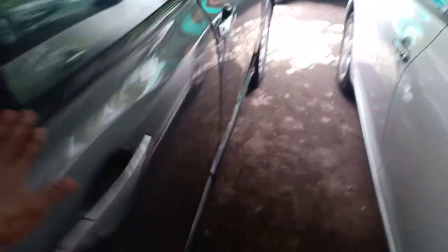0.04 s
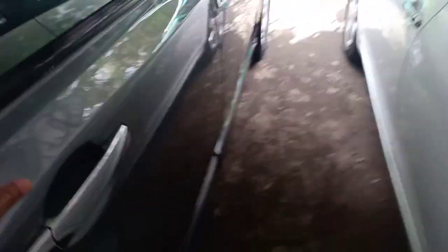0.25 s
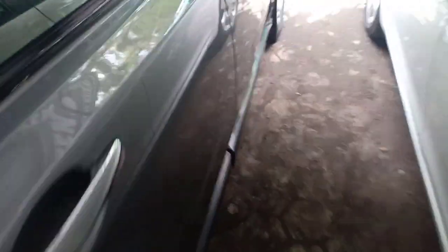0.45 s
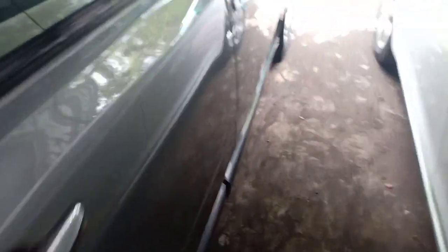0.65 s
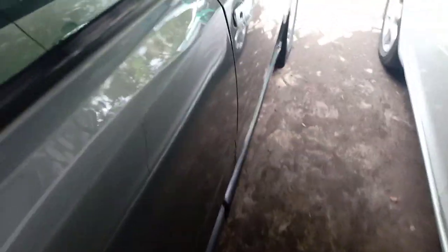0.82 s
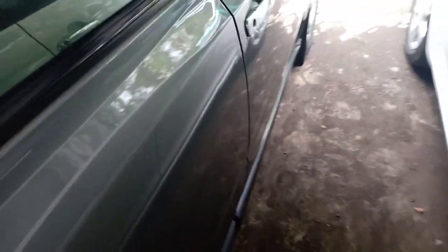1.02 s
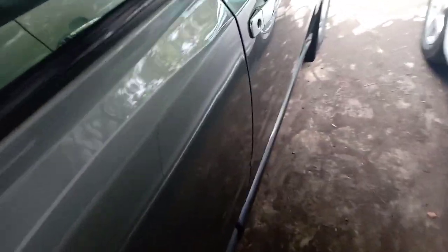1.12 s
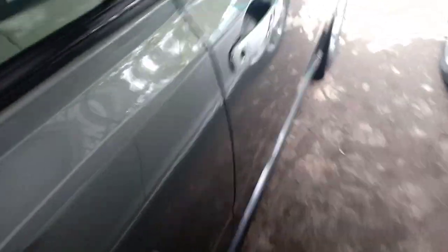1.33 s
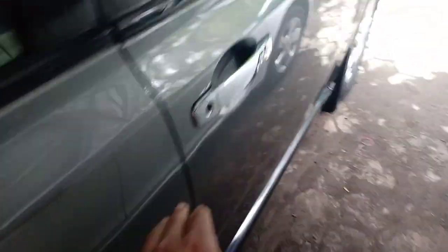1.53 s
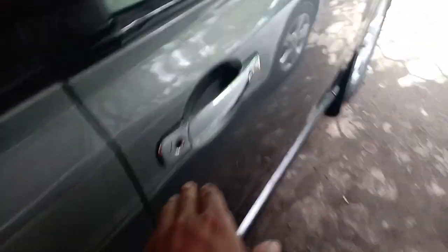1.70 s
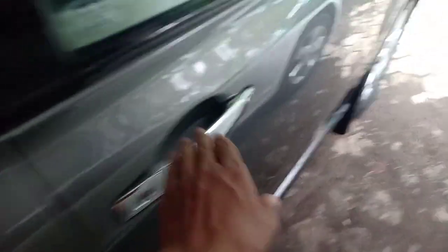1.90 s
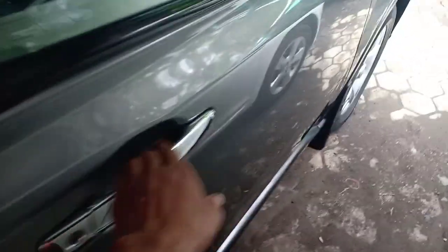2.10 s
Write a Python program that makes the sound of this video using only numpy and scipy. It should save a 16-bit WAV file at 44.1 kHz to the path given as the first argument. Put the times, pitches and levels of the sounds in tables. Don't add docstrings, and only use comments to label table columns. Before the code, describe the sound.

A car door slams shut with a hard metallic clack and thump, then shoes scuff grit.

```python
import sys
import numpy as np
from scipy import signal
from scipy.fft import rfft, irfft
from scipy.io import wavfile
from scipy.ndimage import uniform_filter1d

SR = 44100
rng = np.random.default_rng(int(sys.argv[2]) if len(sys.argv) > 2 else 0)


def boost_factor(decibels):
    exponent = np.asarray(decibels, float) / 20
    return 10 ** exponent


def store_pcm(level_fs):
    pcm = np.round(np.clip(level_fs, -1, 1) * 32767).astype(np.int16)
    wavfile.write(sys.argv[1], SR, np.atleast_2d(pcm).T)


N = 94815

DOOR_LAG_S, SHOE_LAG_S = 0.00037, 0.0001


def door():
    body = latch_metal() + panel_thump() + body_shudder()
    return body * pan(-2.5) + cracks() * pan(4)


# start in seconds, then
# striker, latch, panel and crack levels in dB.
DOOR_BLOWS = [(0.057, -43, -34, -38, -41), (.068, -41.5, -36, -37.5, -49), (.084, -48, -60, -39.5, -50),
              (0.205, -9, -38, -58, -23), (0.2079, -17, -33, -48, -23.5), (0.218, -26, -32, -27, -22.5),
              (0.226, -19, -33, -29.5, -17.5), (0.2331, -30.5, -14.5, -22, -54),
              (0.2383, -17.5, -16, -16.5, -26), (0.2419, -22, -39, -28, -24.5), (0.252, -31, -32, -35, -52),
              (0.2656, -29, -51.5, -45, -17.5), (0.2768, -47, -54, -50, -29), (0.2965, -30, -35, -41, -37),
              (0.304, -34, -48, -33, -37), (0.333, -53, -41, -50, -62), (0.358, -41, -75, -41, -41.5),
              (0.406, -69, -70, -44, -46), (1.9072, -70, -39, -72, -70)]
# pitch in Hz, level in dB, t60 in seconds.
STRIKER_MODES = [(496, -14, 0.014), (851, -7, 0.09), (1845, -17, 0.17), (2300, -20, 0.058),
                 (2500, -6.5, 0.026), (2700, -28, 0.032), (4100, -25, .01), (4800, -15.5, 0.026)]
# pitch in Hz, level in dB, t60 in seconds.
LATCH_MODES = [(304, -5, 0.048), (393, 0.5, 0.064), (493, -1, 0.11), (640, 3, 0.014), (783, -13, 0.094),
               (895, -14, 0.074), (1206, -11, 0.027), (1595, -10, 0.078), (1970, -10, 0.038)]
# start in seconds, level in dB, pitch in Hz.
PART_KNOCKS = [(.0572, -37.5, 2580), (.0655, -30.5, 560), (.0715, -30.5, 483), (.2055, -7.5, 540),
               (.211, -16, 538), (.2135, -18.5, 1850), (.2245, -22, 2530), (.226, -37, 770),
               (.231, -26, 2560), (.249, -21, 632), (.2655, -13, 1544), (.3025, -36, 2600),
               (.2085, -15.5, 4200), (.229, -30, 4740), (.234, -41, 4900), (.2415, -25, 4800),
               (.246, -25, 3950), (.2495, -32, 4900), (.2657, -20, 4850), (.269, -27.5, 5900),
               (.2715, -27, 4960), (.305, -34, 5600), (.311, -37, 5860)]


def latch_metal():
    metal = rung_parts(PART_KNOCKS)
    metal = metal + ring(STRIKER_MODES, DOOR_BLOWS, column=1, push_s=0.0002)
    metal = metal + ring(LATCH_MODES, DOOR_BLOWS, column=2, push_s=0.00042)
    metal = signal.sosfilt(signal.butter(3, 300, "high", fs=SR, output="sos"), metal)
    return between_cars(late(metal, DOOR_LAG_S), -7.5)


# pitch in Hz, level in dB, t60 in seconds.
PANEL_MODES = [(50.6, -16, 0.91), (97, -18, 0.28), (132, -32, 0.06), (203.4, -4, 0.11), (246.4, -10, 0.21),
               (305, -27, 0.21), (380, -7, 0.071), (480, -10, 0.16)]
# start in seconds, level in dB.
SEAL_LANDINGS = [
    (.2653, -5.5),
    (.2738, -8.5),
    (.2973, -15.5),
    (.3035, -22),
    (.345, -36),
    (.408, -34),
    (.0805, -40),
    (.0885, -42),
]
# pitch in Hz, level in dB, t60 in seconds.
CABIN_MODES = [(71.7, -1.5, .072), (109.7, -11, .2), (134.9, -6.5, .155), (195.3, -10.5, .28),
               (235.4, -9, .05), (400.9, -6.5, .097), (516.7, -13, .099)]


def panel_thump():
    panel = ring(PANEL_MODES, DOOR_BLOWS, column=3, push_s=0.0011)
    cabin = ring(CABIN_MODES, SEAL_LANDINGS, column=1, push_s=0.0015)
    return late(panel + cabin, DOOR_LAG_S)


# frequency in Hz, level in dB.
CRACK_COLOUR = [(100, -25), (500, 8), (1200, 9), (2500, -5), (5000, -19), (8000, -44), (15000, -52)]


def cracks():
    bursts = sum(burst(blow[0], blow[4], rise=0.00059, hold=0, t60=0.05) for blow in DOOR_BLOWS)
    return shape(bursts * pair(white, DOOR_LAG_S, 1850), CRACK_COLOUR)


# frequency in Hz, level in dB.
SHUDDER_COLOUR = [(40, -9), (120, -2.5), (400, -10), (1000, -12.5), (3000, -28.5), (6000, -35.5),
                  (15000, -60)]


def body_shudder():
    tail = burst(0.2263, -19.5, rise=0.013, hold=0.0057, t60=0.38) * boost_factor(2 * walk(57.65))
    return shape(tail * pair(lambda: grains(9000, 0.95), DOOR_LAG_S, 1400), SHUDDER_COLOUR)


# start in seconds, level in dB, then rise, hold and t60 in seconds.
SHOE_SCUFFS = [(.0, -53, 0.0028, 0.042, 0.28), (.05, -48.5, 0.0037, 0.025, 0.26),
               (0.094, -45, 0.014, 0.12, 0.27), (.34, -51, 0.0079, 0.078, 0.32),
               (0.508, -56.5, 0.0051, 0.047, 0.54), (0.632, -58.5, 0.0028, 0.016, 0.72),
               (0.739, -57.5, 0.0023, .005, 0.15), (0.776, -68, 0.0027, .005, 0.11),
               (.898, -57.5, 0.0044, 0.053, 0.11), (.946, -56.5, 0.0026, 0.02, 0.071),
               (1.215, -41, 0.0021, 0.014, 0.22), (1.252, -43.5, .006, 0.02, 0.22),
               (1.271, -44.5, 0.0033, 0.013, 0.52), (1.36, -44, 0.014, 0.02, 0.46),
               (1.425, -45.5, 0.0064, 0.027, 0.42), (1.487, -55, 0.011, 0.017, 0.11),
               (1.646, -53, 0.0026, 0.002, 0.093), (1.685, -55.5, 0.0018, 0.013, 0.21),
               (1.758, -57.5, 0.0022, 0.0036, 0.078), (2.05, -51.5, 0.0076, 0.03, 0.43)]
# frequency in Hz, level in dB.
GRIT_COLOUR = [(200, -11.5), (1500, -11), (2000, -4.5), (3000, -2.5), (3700, -5.5), (4900, 1), (6600, -2.5),
               (9800, -23.5)]
# start in seconds, level in dB, then rise, hold and t60 in seconds.
FOOTFALLS = [
    (1.206, -35, 0.001, 0.0047, 0.074),
    (1.25, -52, 0.0054, 0.13, 0.086),
    (1.6712, -37, 0.00037, 0.00085, 0.012),
    (1.886, -28, 0.022, 0.0067, 0.12),
    (1.940, -25, 0.0026, 0.036, 0.34),
    (2.01, -54, 0.0017, 0.0056, 0.41),
]
# frequency in Hz, level in dB.
CRUNCH_COLOUR = [(100, -38.5), (680, -9), (1500, -12.5), (2100, -6.5), (3300, -9), (6200, -11), (9800, -31),
                 (15000, -31)]


def shoes():
    out = 0
    for rows, colour in ((SHOE_SCUFFS, GRIT_COLOUR), (FOOTFALLS, CRUNCH_COLOUR)):
        power = sum(burst(*row) ** 2 for row in rows)
        press = np.sqrt(power) * boost_factor(1 * walk(250))
        out = out + shape(press * pair(lambda: grains(12000, 0.96), SHOE_LAG_S, 2500), colour)
    low, mid = (signal.sosfiltfilt(signal.butter(2, hz, fs=SR, output="sos"), out) for hz in (1700, 3600))
    bands = (low, mid - low, out - mid)
    return sum(band * boost_factor(1.6 * walk(29.66)) for band in bands)


# start in seconds, level in dB, pitch in Hz.
PEBBLE_SNAPS = [(.0585, -34, 4800), (1.2785, -32, 3870), (1.316, -43, 2850), (1.324, -46, 5300),
                (1.373, -45, 5300), (1.381, -51, 5400), (1.231, -44, 2300), (1.291, -43, 2130),
                (.7735, -49, 14800), (1.921, -36, 2500), (0.747, -46, 2880), (1.2075, -51, 2300),
                (1.6712, -39, 5070), (1.28, -40, 2300), (1.281, -49, 4800), (1.897, -41, 2100),
                (1.905, -42, 2300), (1.998, -20, 2580), (1.911, -29, 2070), (1.9453, -17, 2510),
                (1.952, -18, 2300), (1.9595, -11, 2555), (1.969, -23.5, 2770), (1.9749, -18, 2400),
                (2.011, -21, 2950), (2.024, -25, 2300), (2.088, -41, 2500)]


def pebbles():
    return late(rung_parts(PEBBLE_SNAPS), SHOE_LAG_S)


# start in seconds, level in dB, then rise, hold and t60 in seconds.
GRIT_TICKS = [
    (0.0564, -38, 0.00084, 0.00095, .012),
    (0.525, -53, 0.00024, .001, 0.013),
    (0.744, -57, .0003, .001, .012),
    (0.7725, -52, 0.00034, 0.0017, 0.013),
    (.790, -54, 0.00023, .001, 0.01),
    (0.9, -53, 0.00023, .002, .015),
    (.9468, -50.5, 0.00028, 0.00091, .012),
    (1.6477, -53, .0003, 0.0011, 0.0085),
    (1.762, -63, 0.00046, .001, 0.0091),
]
# frequency in Hz, level in dB.
TICK_COLOUR = [(300, -9), (2500, 6), (6000, 5), (9000, -13), (14500, -5)]


def ticks():
    clicks = sum(burst(*row) for row in GRIT_TICKS)
    return shape(clicks * pair(white, SHOE_LAG_S, 7100), TICK_COLOUR)


# start in seconds, level in dB, pitch in Hz, length in seconds.
NARROW_HUMS = [(0.495, -60, 705, 0.038), (1.196, -60, 6000, 0.017), (1.247, -53.5, 523, 0.014),
               (0.091, -54, 2130, 0.0091), (1.252, -58.5, 2280, 0.048), (1.373, -75, 2780, 0.028),
               (1.432, -55, 2800, 0.015), (1.345, -69, 5300, 0.019), (1.425, -79, 5300, 0.011),
               (1.476, -63.5, 2330, 0.045), (1.934, -34.5, 2540, 0.031), (1.94, -73, 5210, 0.017),
               (2.089, -57.5, 750, .08)]


def hums():
    noise, tones = white(), 0
    for start, db, hz, length in NARROW_HUMS:
        tone = signal.lfilter(*signal.iirpeak(hz, 9, SR), noise)
        level = db + 26 - 10 * np.log10(hz / 750)
        tones = tones + burst(start, level, rise=0.015, hold=length, t60=0.08) * tone
    return late(tones, SHOE_LAG_S)


# frequency in Hz, level in dB per Hz.
TOWN_COLOUR = [(30, -2.5), (65, -3.5), (100, 0.5), (140, -7.5), (1200, -20.5), (3500, -28), (6500, -35.5),
               (10000, -43)]


def town():
    air = shape(pair(white, 0.0001, 530), TOWN_COLOUR)
    low = signal.sosfilt(signal.butter(2, 250, fs=SR, output="sos"), air)
    return boost_factor(-52) * (low * boost_factor(2.0 * walk(9.97)) + (air - low) * boost_factor(0.81 * walk(4.4)))


def between_cars(x, db):
    t = np.arange(SR // 10) / SR
    echo = rng.standard_normal((2, len(t))) * boost_factor(-60 * t / 0.09) * (t > 0.001)
    echo = echo / np.sqrt(np.sum(echo ** 2) / 2)
    return x + boost_factor(db) * signal.fftconvolve(x, echo, axes=1)[:, :N]


def ring(modes, blows, column, push_s):
    t, force = np.arange(SR // 2) / SR, np.zeros(N)
    for blow in blows:
        force[int(blow[0] * SR)] = boost_factor(blow[column])
    push = np.sin(np.pi * np.clip((t[:256] + 0.5 / SR) / push_s, 0, 1)) ** 2
    body = sum(boost_factor(db - 60 * t / t60) * np.sin(2 * np.pi * hz * t) for hz, db, t60 in modes)
    return -signal.fftconvolve(force, signal.fftconvolve(push / push.sum(), body))[:N]


def rung_parts(rows):
    out, t = np.zeros(N + 2048), np.arange(2048) / SR
    for start, db, hz in rows:
        cycles = t * hz
        decay = boost_factor(db - 30 * np.clip(cycles - 2.5, 0, None) / 9)
        swell = np.minimum(cycles / 2.5, 1) * decay
        out[int(start * SR):][:2048] += swell * np.sin(2 * np.pi * cycles)
    return out[:N]


def grains(per_s, scatter_db):
    hits = rng.random(N) < per_s / SR
    x = hits * rng.standard_normal(N) * boost_factor(scatter_db * rng.exponential(size=N))
    return x / x.std()


def white():
    return rng.standard_normal(N)


def burst(start, db, rise, hold, t60):
    out, first = np.zeros(N), int(start * SR)
    t = np.arange(min(N - first, int((rise + hold + t60) * SR))) / SR
    release = boost_factor(db - 60 * np.clip(t - rise - hold, 0, None) / t60)
    out[first:first + len(t)] = release * np.clip(t / rise, 0, 1) ** 2
    return out


def walk(rate):
    k = int(SR / rate)
    held = np.repeat(rng.standard_normal(N // k + 1), k)[:N]
    return 1.3 * uniform_filter1d(uniform_filter1d(held, k), k)


def shape(x, points):
    hz, db = np.array(points, float).T
    f = np.maximum(np.arange(2049) * SR / 4096, 1)
    cepstrum = irfft(np.interp(np.log(f), np.log(hz), db) * np.log(10) / 20)
    cepstrum[1:2048] *= 2
    cepstrum[2049:] = 0
    h = irfft(np.exp(rfft(cepstrum)))[:2048]
    return signal.fftconvolve(x, (h / np.sqrt(np.sum(h ** 2)))[None], axes=1)[:, :N]


def late(x, lag_s):
    return np.array([np.roll(x, int(lag_s * SR)), x])


def pair(draw, lag_s, apart_hz):
    low, high = (signal.butter(1, apart_hz, kind, fs=SR, output="sos") for kind in ("low", "high"))
    return signal.sosfilt(low, late(draw(), lag_s)) + signal.sosfilt(high, np.array([draw(), draw()]))


def pan(db):
    return boost_factor(db * np.array([[0.5], [-0.5]]))


def scene():
    feet = between_cars(boost_factor(-4) * shoes() + pebbles(), -8) + hums() + ticks()
    return door() + feet * pan(0.95) + town()


def top_cut(x):
    return signal.sosfilt(signal.butter(12, 15830, fs=SR, output="sos"), x)


# pitch in Hz, width in Hz, level in dB.
PORT_RINGS = [(2400, 800, 8), (5600, 1210, 7), (13600, 560, 9.5)]


def record(dry):
    out = signal.sosfilt(signal.butter(3, 62, "high", fs=SR, output="sos"), dry)
    out = signal.sosfilt(signal.ellip(8, 0.3, 60, 15550, fs=SR, output="sos"), out)
    for hz, width_hz, db in PORT_RINGS:
        out = out + (boost_factor(db) - 1) * signal.lfilter(*signal.iirpeak(hz, hz / width_hz, SR), out)
    return top_cut(out)


dry = scene()
out = record(dry)
store_pcm(out)
```